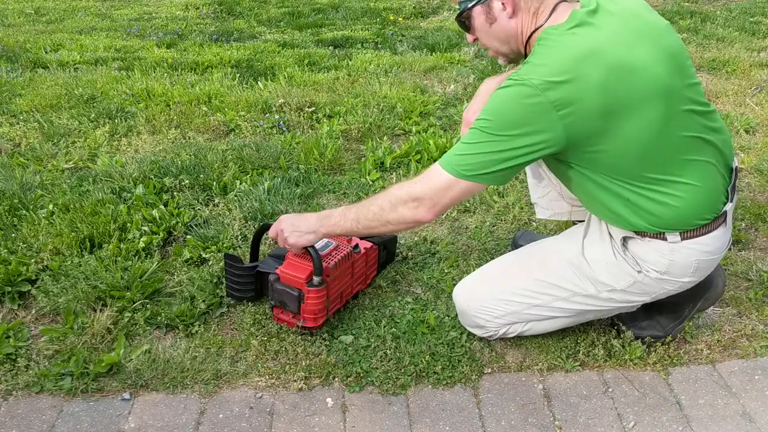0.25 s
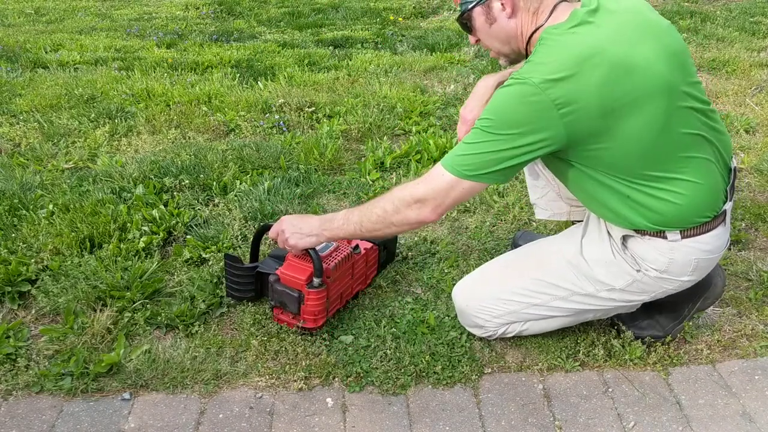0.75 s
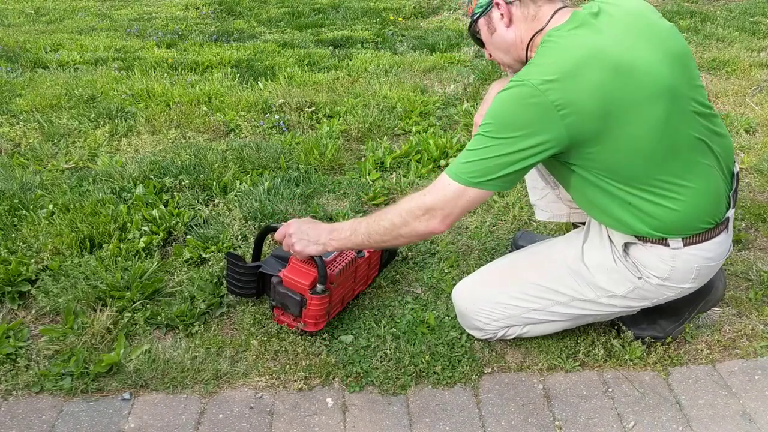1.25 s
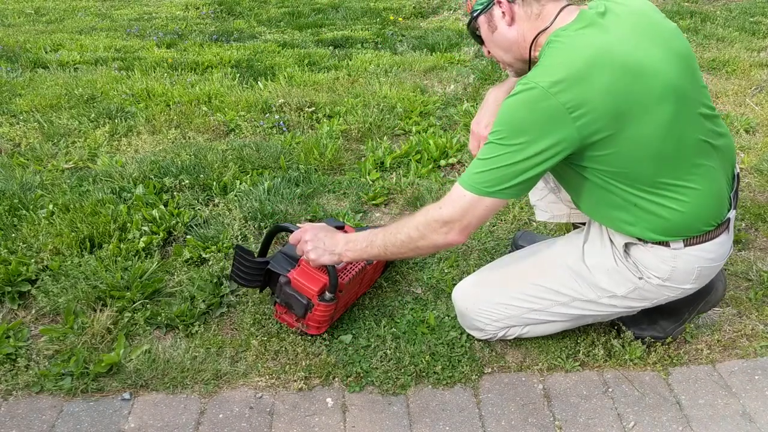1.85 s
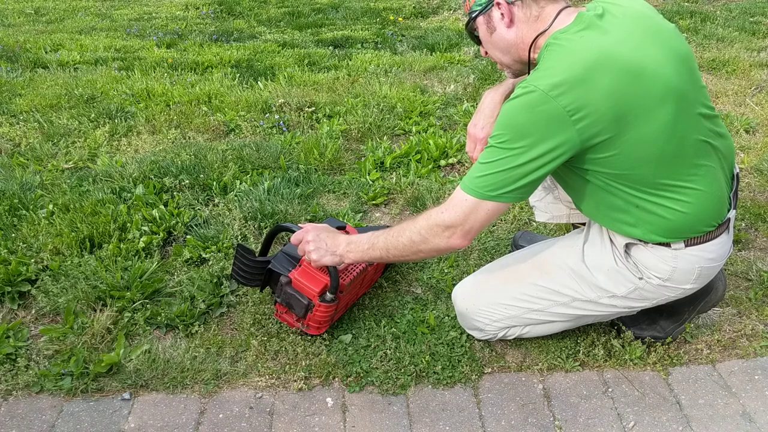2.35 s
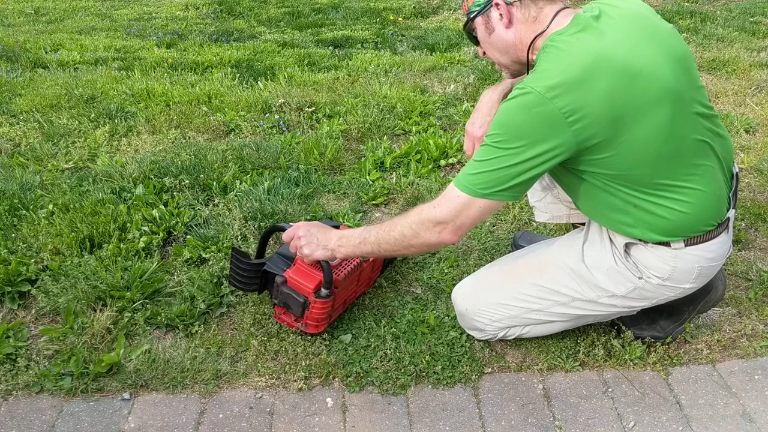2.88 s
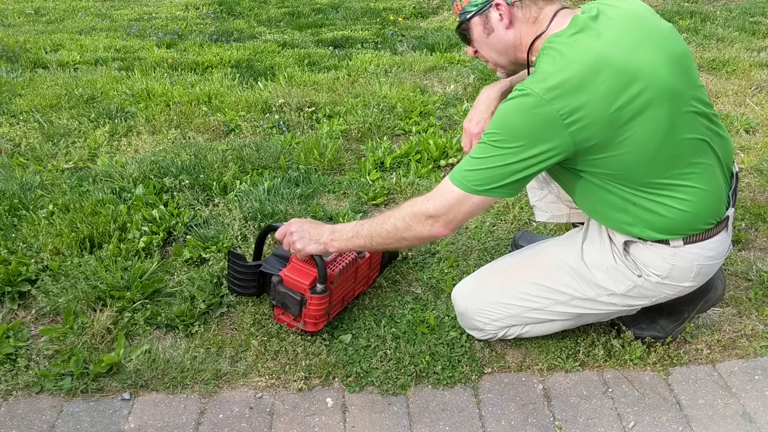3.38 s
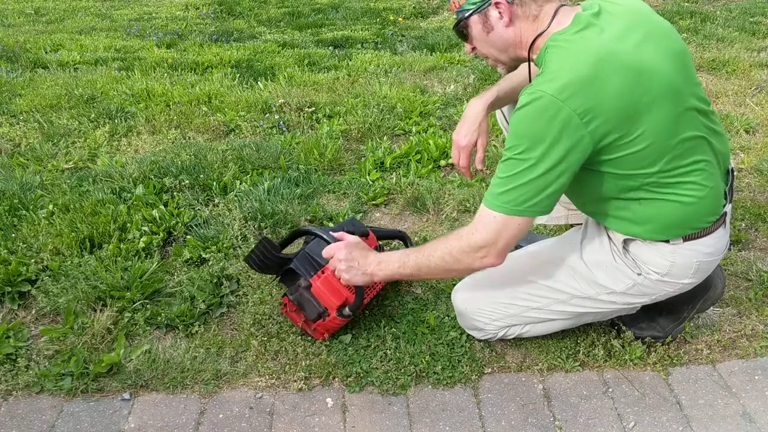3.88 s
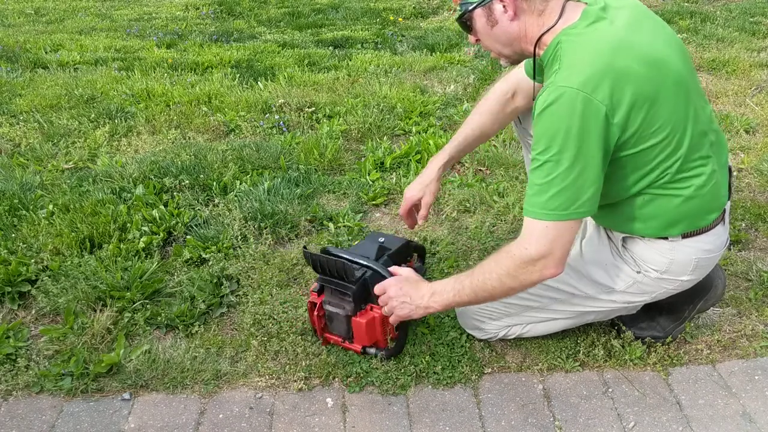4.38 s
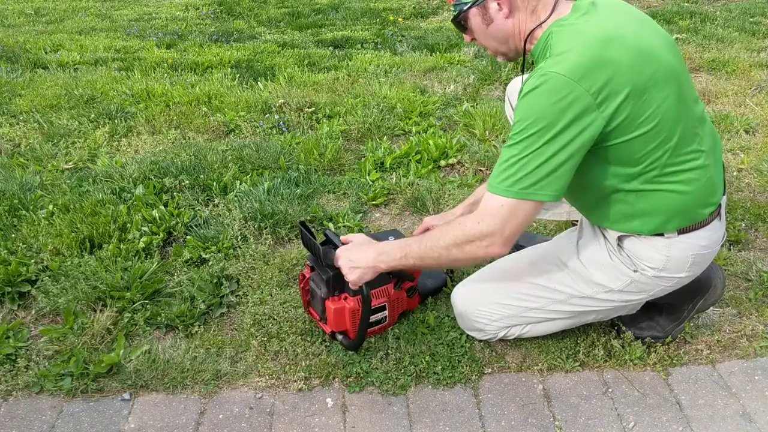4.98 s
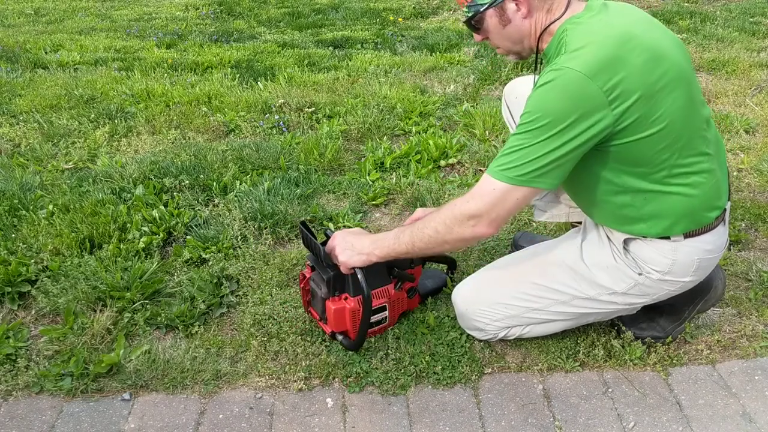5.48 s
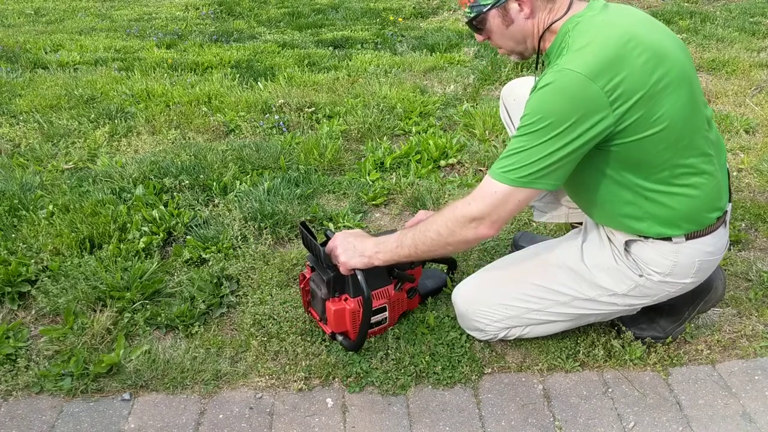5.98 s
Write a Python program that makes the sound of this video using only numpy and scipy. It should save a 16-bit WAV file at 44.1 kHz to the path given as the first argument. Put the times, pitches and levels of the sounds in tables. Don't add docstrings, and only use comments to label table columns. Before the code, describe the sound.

Quiet lawn with faint birds, crickets and a far-off yapping dog; a plastic case brushes and clicks before heavy wind buffeting takes over.

```python
import sys
import numpy as np
from scipy import signal
from scipy.fft import rfft, irfft
from scipy.io import wavfile
from scipy.ndimage import uniform_filter1d

SR = 44100
rng = np.random.default_rng(int(sys.argv[2]) if len(sys.argv) > 2 else 0)


def dump(signal):
    limited = np.clip(np.atleast_2d(signal).T, -1, 1)
    pcm = np.round(limited * 32767).astype(np.int16)
    wavfile.write(sys.argv[1], SR, pcm)


def attenuation_scalar(level_db):
    decades = np.asarray(level_db, float) / 20
    return 10 ** decades


N = 275184


def evened(x):
    return x / np.sqrt(np.mean(x ** 2) + 1e-20)


def noise(length):
    return rng.standard_normal(length)


def read(points, hz):
    f, value = np.transpose(points)
    return np.interp(np.log(hz + 1), np.log(f + 1), value)


def add(mix, s, sound):
    part = mix[round(s * SR):][:len(sound)]
    part += sound[:len(part)]


def coloured(x, points):
    gain = attenuation_scalar(read(points, np.fft.rfftfreq(len(x), 1 / SR)))
    return evened(irfft(rfft(x) * gain, len(x)))


def slow(length, hz):
    smoother = signal.butter(2, hz, fs=SR, output="sos")
    settle = 4000
    return evened(signal.sosfilt(smoother, noise(length + settle))[settle:])


def resonate(x, hz, width_hz):
    turn = np.exp(2j * np.pi * np.cumsum(hz * np.ones(len(x))) / SR)
    r = np.exp(-np.pi * width_hz / SR)
    smooth = signal.lfilter([(1 - r) ** 2], [1, -2 * r, r * r], x / turn + 1e-18)
    return 2 * (turn * smooth).real


def fuzzy_note(length, hz, width_hz):
    return evened(resonate(noise(length), hz, width_hz))


def whistle(hz, waver=.3, fade=.4):
    tone = np.sqrt(2) * np.sin(2 * np.pi * np.cumsum(hz) / SR)
    return tone * (1 + waver * slow(len(hz), 96)) * signal.windows.tukey(len(hz), np.clip(fade, 0, 1))


def glide(start_hz, end_hz, length):
    return np.linspace(start_hz, end_hz, round(length * SR))


def bout(length, fade=.3):
    return signal.windows.tukey(round(length * SR), np.clip(fade, 0, 1))


def yard(x, t60, wet_db, walls):
    t = np.arange(SR // 2) / SR
    sparse = rng.choice([-1., 1.], len(t)) * (rng.random(len(t)) < .04)
    tail = sparse * attenuation_scalar(-60 * t / t60) * (t > .006)
    tail *= attenuation_scalar(wet_db) / np.linalg.norm(tail)
    for s, db in [(0, 0.031)] + walls:
        add(tail, s, attenuation_scalar(np.array([db])))
    return signal.fftconvolve(x, tail)[:N]


# (frequency [Hz], level [dB per Hz])
AIR = [(82, -27.5), (140, -5), (155, -3.5), (363, -11.5), (400, -11), (442, -13.5), (903, -11), (2120, -21),
       (3150, -26), (5380, -30.5), (7530, -32.5), (8650, -38), (15100, -37.5), (16000, -44)]
# (time [s], traffic level [dB], leaves level [dB])
DRIFT = [(0, -1, -0.5), (.5, 0, -1), (1.5, 0, -1), (2.5, 2, -1.5), (3.5, 2.5, -1.5), (4.2, 3, 0.5),
         (4.9, 3.5, 2), (5.5, 3, 1.5), (6.24, 3, 0)]


def background():
    frames, hz = N // 256 + 5, np.fft.rfftfreq(1024, 1 / SR)
    a, b, patches = rng.standard_normal((frames, 513, 3)).T
    patches = uniform_filter1d(patches, size=10, axis=0)
    patches = evened(uniform_filter1d(patches, size=16, axis=1))
    s, traffic_db, leaves_db = np.transpose(DRIFT)
    t = np.arange(frames) * 256 / SR
    high = (1 / (1 + (3500 / (hz + 1)) ** 2))[:, None]
    drift_db = (1 - high) * np.interp(t, s, traffic_db) + high * np.interp(t, s, leaves_db)
    patchy = (a + 1j * b) * attenuation_scalar(0.65 * patches + drift_db)
    white = signal.istft(patchy, nperseg=1024, noverlap=768)[1][:N]
    return attenuation_scalar(-52) * coloured(white, AIR)


# (time [s], length [s], level [dB])
HUM_SWELLS = [
    (-.1, .55, -56),
    (.85, 1.6, -57.5),
]


def drone():
    swell = np.zeros(N + SR)
    for s, length, db in HUM_SWELLS:
        add(swell, s + 1, attenuation_scalar(db) * bout(length, 0.38))
    hz = 126 * (1 + .02 * slow(N, 1.1))
    return swell[SR:] * fuzzy_note(N, hz, 13.0)


# (time [s], length [s], ring [Hz], level [dB])
BOUTS = [(.2, 0.4, 7320, -77), (.97, .5, 7370, -80), (1.75, 0.3, 7330, -82), (2.28, 0.09, 7330, -81),
         (2.522, .32, 7540, -80), (3.328, 0.29, 7360, -81.5), (3.9, 0.33, 7330, -79),
         (4.735, .09, 7200, -75), (4.97, 0.49, 7330, -77), (5.918, 0.15, 7400, -76),
         (.04, 0.037, 4300, -74), (.17, 0.18, 4370, -78), (.5, 0.074, 4370, -77)]


def crickets():
    out = np.zeros(N)
    for s, length, hz, db in BOUTS:
        shape = bout(length, 0.23)
        t = np.arange(len(shape)) / SR
        throb = 5.2 + 0.73 * np.sin(2 * np.pi * 22 * t)
        song = evened(resonate(noise(len(t)), hz, 110) * throb)
        add(out, s, attenuation_scalar(db) * shape * song)
    return out


SLUR_HZ = 2720, 330, 1050
# (time [s], length [s], start [Hz], end [Hz], level [dB])
NOTES = [
    (0.151, 0.18, 1690, 3120, -75),
    (0.31, 0.037, 3100, 3760, -68),
    (5.32, .05, 3300, 3200, -75),
    (5.655, 0.075, 2700, 3200, -67),
    (5.866, .1, 4084, 4040, -63.5),
    (6.08, 0.011, 5000, 5650, -67),
]
# (time [s], length [s], start [Hz], settled [Hz], level [dB])
BUZZES = [
    (1.75, 0.1, 7500, 7600, -69),
    (3.727, 0.19, 7800, 7500, -61.5),
    (5.783, .14, 8000, 7800, -63),
]


def songbirds():
    out, u = np.zeros(N), np.linspace(0, 1, round(0.035 * SR))
    first_s, spacing_s = .724, .1283
    slur_hz = np.dot(SLUR_HZ, [u ** 0, u, u ** 3])
    for k, chance in enumerate(noise(14)):
        slur = whistle(slur_hz, .15, .6) * (.15 + 1.4 * u)
        db = -69 + .8 * chance + 2.5 * (k % 3 == 1)
        add(out, first_s + k * spacing_s, attenuation_scalar(db) * slur)
    for s, length, start_hz, end_hz, db in NOTES:
        add(out, s, attenuation_scalar(db) * whistle(glide(start_hz, end_hz, length), .15, .3))
    for s, length, start_hz, end_hz, db in BUZZES:
        t = np.arange(round(length * SR)) / SR
        hz = end_hz + (start_hz - end_hz) * np.exp(-t / 0.033)
        lower = 0.57 * fuzzy_note(len(t), hz - 280, 240)
        upper = 0.39 * fuzzy_note(len(t), hz + 294, 240)
        add(out, s, attenuation_scalar(db - 6.5 * t / length) * (lower + upper) * bout(length, 0.16))
    return yard(out, .25, -9, [])


# (time [s], peak level [dB], start [Hz], end [Hz], scatter from the trees [dB])
CHIPS = [
    (0.8989, -52, 5600, 8460, -6),
    (2.1755, -49.5, 5650, 8200, -8),
    (2.8265, -50.5, 5300, 7950, -5.5),
    (4.7073, -36.5, 5570, 8350, -19),
]


def chips():
    out, t = np.zeros(N), np.arange(SR // 5) / SR
    for s, db, start_hz, end_hz, scatter_db in CHIPS:
        snap = whistle(glide(start_hz, end_hz, 0.0072), 0.11, 0.64)
        add(out, s - .002, attenuation_scalar(db - 10.5) * snap)
        smear = fuzzy_note(len(t), 7100, 3000)
        add(out, s + 0.0056, attenuation_scalar(db - 15.5 + scatter_db - 60 * t / 0.7) * smear)
    return yard(out, 0.32, -7.5, [(.0055, -9), (.0095, -6), (.021, -9.5)])


# (time [s], length [s], top of second harmonic [Hz], its end [Hz], level [dB])
YAPS = [
    (0.036, 0.1, 1418, 1295, -56.5),
    (2.238, 0.08, 1408, 1323, -56),
    (2.761, 0.095, 1420, 1298, -51),
    (3.719, .13, 1467, 1200, -48.5),
    (4.36, 0.113, 1469, 1210, -48.5),
    (4.89, 0.1, 1427, 1228, -46),
    (5.836, 0.097, 1384, 1220, -47.5),
]
# (time [s], length [s], start [Hz], end [Hz], level [dB])
WHINES = [
    (0.129, 0.1, 1500, 1710, -66),
    (2.304, 0.12, 1430, 1401, -63),
    (2.735, 0.04, 1400, 1640, -64),
    (2.86, 0.066, 1630, 1397, -64),
    (3.865, 0.09, 1760, 1380, -58),
    (4.478, 0.095, 1740, 1362, -59),
    (5.018, 0.08, 1663, 1345, -59.5),
    (5.945, .07, 1640, 1374, -61),
]


def dog():
    out = np.zeros(N)
    rise_s, scoop, attack_s = .03, .16, .016
    open_hz = 1460
    for s, length, top_hz, end_hz, db in YAPS:
        t = np.arange(0, length, 1 / SR)
        bends = [1 - scoop, 1, 1, end_hz / top_hz]
        arch = uniform_filter1d(np.interp(t, [0, rise_s, 1.434 * rise_s, length], bends), size=600)
        hz = top_hz * arch * (1 + 0.012 * slow(len(t), 100))
        fade = attenuation_scalar(np.interp(t / length, [0.54, 1], [db, db - 7]))
        level = np.minimum(t / attack_s, 1) * fade
        hoarse = fuzzy_note(len(t), hz, 230)
        covered = s < 3
        closing = np.maximum(1 - top_hz * arch / open_hz, 0)
        third = attenuation_scalar(-12.5 - 120 * closing - 9 * covered) * whistle(1.5 * hz, 0.31, .3)
        voice = whistle(hz, 0.18, 0.062) + 0.22 * (1 + 2.9 * covered) * hoarse + third
        add(out, s, level * voice)
    for s, length, start_hz, end_hz, db in WHINES:
        hz = glide(start_hz, end_hz, length)
        airy = fuzzy_note(len(hz), hz, 200) * bout(length, .5)
        add(out, s, attenuation_scalar(db) * (0.5 * airy + 0.69 * whistle(hz, .3, .3)))
    return yard(out, 1.0, -9, [(.021, -37)])


# (time [s], length [s], level [dB])
DRAGS = [
    (.03, 0.46, -72.5),
    (4.237, 0.36, -67),
    (4.752, 0.47, -67),
    (5.0, 1.6, -72.5),
]
# (time [s], peak level [dB], ring [Hz], 60 dB decay [s], share of bright crack)
TICKS = [(4.289, -60, 7800, .015, 1.2), (4.292, -54, 6300, .02, .4), (4.305, -61, 6100, .04, .8),
         (4.35, -61, 10500, .012, 1.2), (4.921, -57, 4800, .009, 1.3), (4.963, -60, 3100, .012, .9),
         (4.977, -62, 9300, .012, 1.0), (4.982, -43.5, 2450, .013, .22), (5.0, -63, 8500, .012, 1.2),
         (5.011, -58, 3900, .015, .8), (5.014, -61, 5800, .03, .4), (5.022, -60, 4200, .012, .8)]


def handling():
    stir = np.zeros(N)
    for s, length, db in DRAGS:
        add(stir, s, attenuation_scalar(db) * bout(length, 0.61))
    blades = noise(N) * attenuation_scalar(0.93 * slow(N, 67))
    brush = [(1500, -42), (3000, 0.5), (7000, -3.5), (12000, -16.5), (16000, -15)]  # (Hz, dB)
    out = stir * coloured(blades, brush)
    t = np.arange(2000) / SR
    for s, db, hz, t60, crack_share in TICKS:
        ring = np.sin(2 * np.pi * hz * t) * attenuation_scalar(-60 * t / t60)
        crack = resonate(noise(len(t)), 4000, 9000) * attenuation_scalar(-60 * t / .012)
        add(out, s, attenuation_scalar(db + 4) * (ring + 2.1 * crack_share * crack))
    return out


# (time [s], level [dB])
BREEZE = [(0, -51), (.15, -58), (.6, -56.5), (1.0, -53.5), (2.0, -52.5), (2.32, -56), (2.4, -49.5),
          (2.7, -49.5), (2.82, -59), (3.05, -51), (3.5, -54.5), (3.83, -42.5), (4.05, -47.5), (4.45, -46),
          (4.56, -49.5), (6.24, -48.5)]
# (frequency [Hz], level [dB])
SILENT = [(2500, -130), (20000, -130)]


def breeze():
    db = np.interp(np.arange(N) / SR, *np.transpose(BREEZE))
    spectrum = [(25, -36), (45, 6.0), (90, 3.5), (127, 4.5), (160, -17), (220, -30)]  # (Hz, dB)
    low = coloured(noise(N), spectrum + SILENT)
    return attenuation_scalar(db + slow(N, 5.8)) * low


# (time [s], peak level [dB], pitch [Hz])
SLAPS = [(4.653, -14.5, 79), (4.677, -10, 79.5), (4.734, -18, 101), (4.835, -4.5, 98), (4.871, -22, 135),
         (4.897, -10, 83), (4.918, -17, 87), (4.988, -16, 76), (5.06, -15, 90), (5.132, -30, 68),
         (5.23, -41, 64.6), (5.274, -33, 73), (5.327, -11.5, 117), (5.415, -8, 77.6), (5.465, -23, 103),
         (5.579, -15, 108), (5.802, -9, 58), (5.819, -31, 61.9), (5.886, -19, 73), (5.949, -34, 107),
         (6.149, -17, 169), (6.211, -14, 88)]


def slaps():
    out = np.zeros(N)
    for s, db, hz in SLAPS:
        turn = np.arange(-1.5 * SR / hz, 1.5 * SR / hz) * hz / SR
        swing = np.sin(2 * np.pi * (turn + rng.random())) * np.exp(-turn ** 2)
        add(out, s - 0.68 / hz, attenuation_scalar(db - 15) * swing)
    return out


# (peak time [s], rumble level [dB], rise [s], fall [s], flutter above the rumble [dB])
GUSTS = [(3.84, -41.5, 0.18, 0.07, -14), (4.6, -40, .05, .04, -13), (4.668, -31, 0.043, 0.08, -1),
         (4.74, -31.5, 0.035, 0.047, 1), (4.844, -23.5, 0.037, 0.021, -13), (4.9, -19.5, 0.038, 0.047, -5),
         (5.008, -26.5, 0.036, 0.028, -6.5), (5.076, -32, 0.031, 0.015, -12),
         (5.144, -30.5, 0.051, 0.015, -17), (5.228, -35.5, 0.071, .03, -9),
         (5.279, -31.5, 0.039, 0.024, -12), (5.335, -33, 0.024, 0.027, -6.5),
         (5.421, -25, 0.036, 0.016, -6.5), (5.44, -33.5, 0.021, 0.012, 8.5),
         (5.468, -31, 0.009, 0.048, 0.5), (5.53, -31, 0.03, 0.054, -3.5), (5.594, -30, 0.037, 0.047, -2.5),
         (5.68, -30, 0.055, 0.055, -11), (5.74, -30, 0.037, 0.033, -9.5), (5.818, -22, 0.04, 0.038, -10),
         (5.885, -23.5, .03, 0.03, -2.5), (5.98, -27.5, 0.1, 0.062, -12), (6.06, -33.5, 0.033, 0.028, -11),
         (6.151, -30.5, 0.021, 0.038, -1), (6.21, -27.5, 0.026, 0.074, -2.5)]
# (frequency [Hz], level [dB])
BUFFET = [(20, -47), (35, -6.5), (55, -1), (75, 2), (110, 1), (140, -13.5), (200, -39)]


def gusts():
    s, db, rise, fall, flutter_db = np.transpose(GUSTS)[:, :, None]
    t = np.arange(0, N, 64) / SR
    edge_db, roundness = 11, 1.74
    force_db = db - edge_db * abs((t - s) / np.where(t < s, rise, fall)) ** roundness
    rasp_db = -8.5 + 0.79 * flutter_db + 0.41 * (db + 24)

    def strength(extra_db):
        total = np.sqrt((attenuation_scalar(force_db + extra_db) ** 2).sum(axis=0))
        return np.interp(np.arange(N) / SR, t, total)

    lumps = slow(N, 14.4)
    rumble = coloured(noise(N) * attenuation_scalar(0.43 * lumps), BUFFET + SILENT)
    rumble = evened(rumble / (abs(signal.hilbert(rumble)) + 0.34) ** 0.29)
    quick = attenuation_scalar(1.8 * lumps)
    flutter_tone = [(90, -45), (130, 3.5), (190, 0), (260, -6.5), (340, -62)]  # (Hz, dB)
    flutter = coloured(noise(N) * quick, flutter_tone + SILENT)
    rasp_tone = [(200, -27), (260, -2.5), (400, -13.5), (600, -25.5), (1200, -61)]  # (Hz, dB)
    rasp = coloured(noise(N) * quick, rasp_tone + SILENT)
    return 1.02 * strength(0) * rumble + 1.14 * strength(flutter_db) * flutter + 0.86 * strength(rasp_db) * rasp


def scene():
    far = background() + drone() + crickets() + songbirds() + chips() + dog()
    wind = breeze() + slaps() + gusts()
    return (far + handling() + wind)[None]


def low_pass(x):
    return signal.sosfilt(signal.butter(12, 16430, fs=SR, output="sos"), x)


def record(dry):
    cut = signal.sosfilt(signal.butter(4, 46, "highpass", fs=SR, output="sos"), dry)
    cut = .26 * np.tanh(cut / .26)
    treble_limit = signal.firwin(1023, 15780, window=("kaiser", 9), fs=SR)[None]
    cut = signal.oaconvolve(cut, treble_limit, "same")
    return low_pass(cut)


dry = scene()
out = record(dry)
dump(out)
```